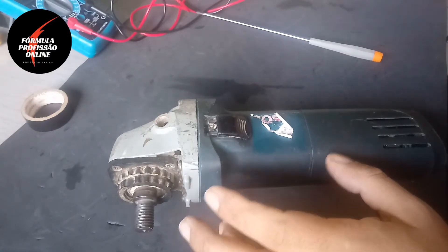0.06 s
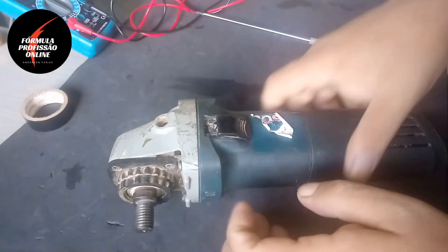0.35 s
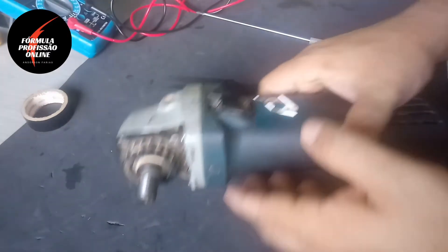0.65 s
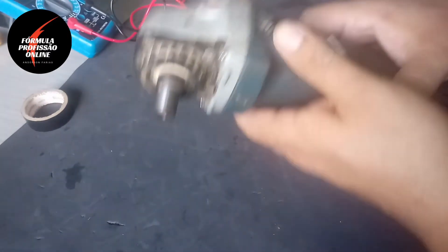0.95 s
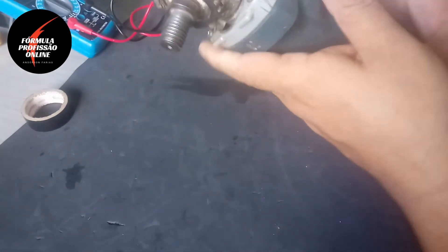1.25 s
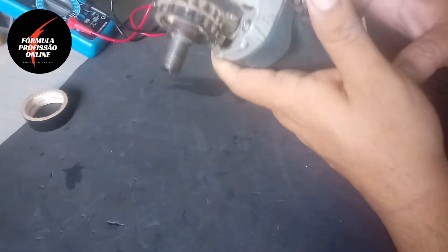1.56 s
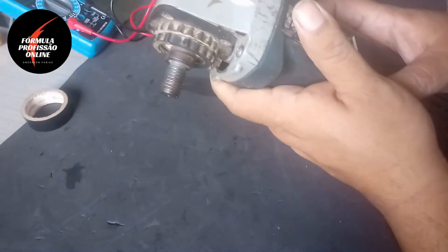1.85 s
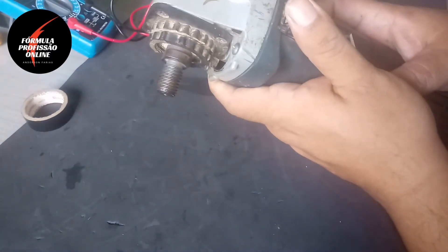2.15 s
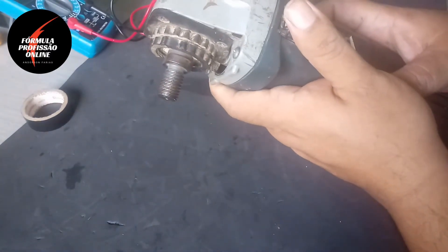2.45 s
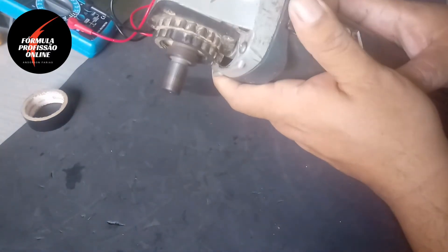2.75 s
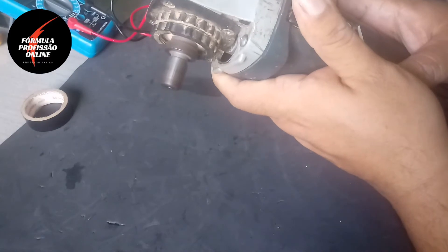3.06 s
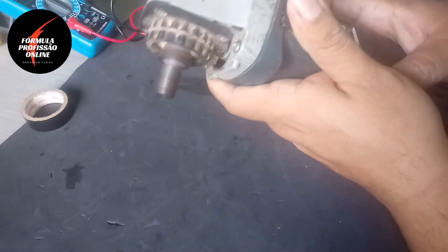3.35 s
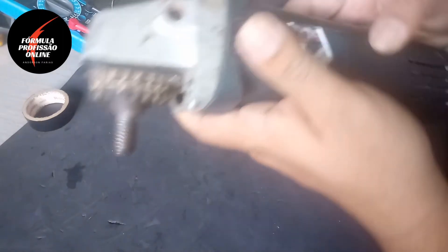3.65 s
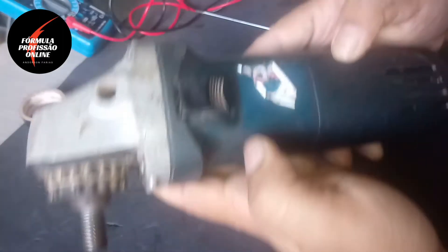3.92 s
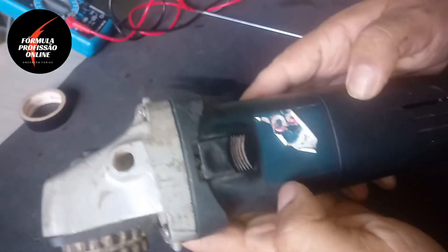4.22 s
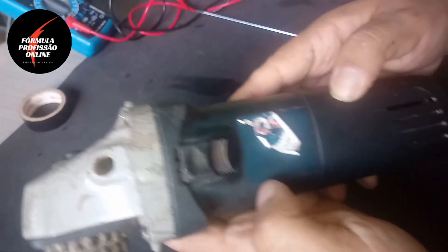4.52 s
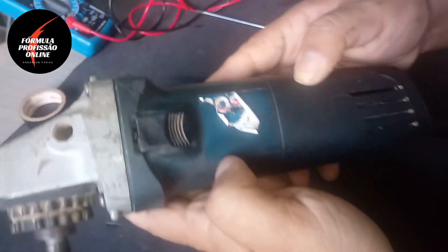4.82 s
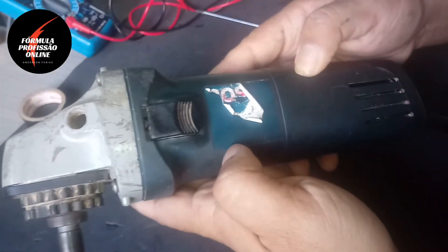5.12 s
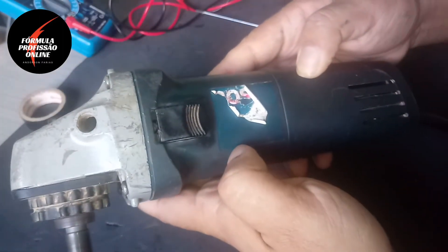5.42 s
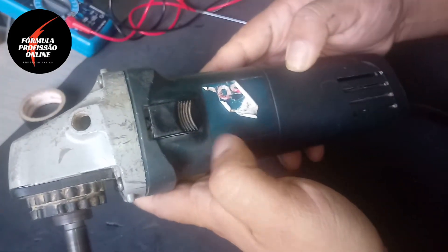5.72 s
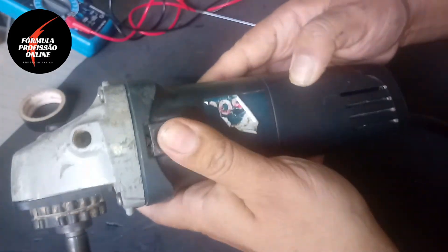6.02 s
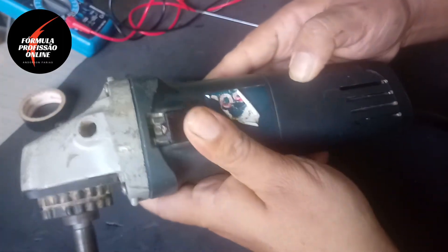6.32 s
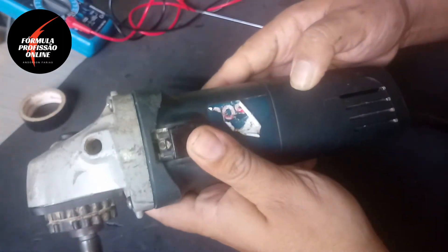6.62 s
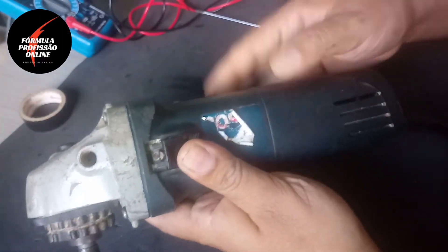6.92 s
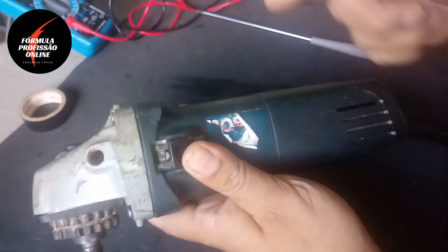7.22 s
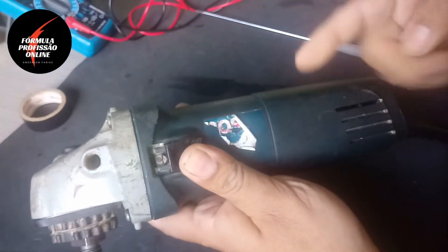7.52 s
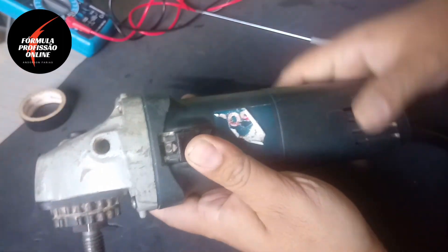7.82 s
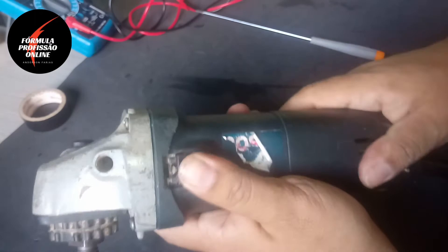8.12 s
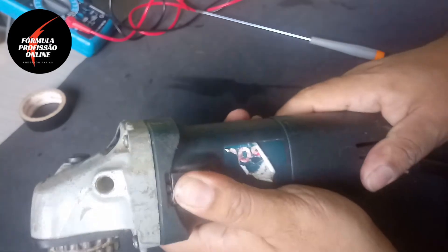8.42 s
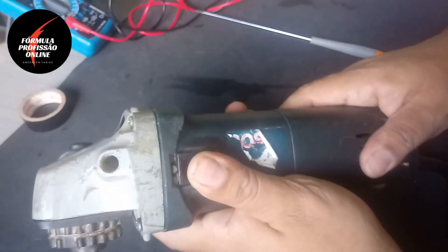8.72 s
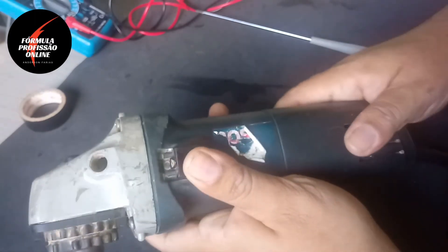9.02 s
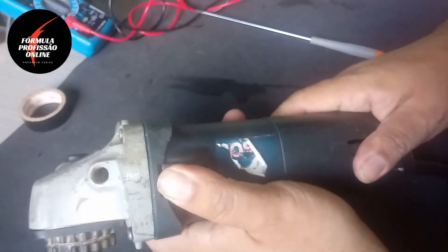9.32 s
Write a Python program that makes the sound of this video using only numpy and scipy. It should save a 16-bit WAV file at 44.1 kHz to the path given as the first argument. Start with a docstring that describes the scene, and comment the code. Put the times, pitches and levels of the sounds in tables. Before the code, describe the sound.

After soft handling, an electric angle grinder whines loudly, coasts to a clattering stop, then starts again, dips briefly and speeds back up.

```python
"""In a small workshop, hands rub and tap a bare angle grinder as they lift it off a bench; a far engine passes.
At 2.5 s the switch snaps shut and the rotor spins up, singing in shaft orders (pinion teeth, commutator
bars) over the rasp of bevel gears, brushes and cooling air. From 6.2 s friction and drag brake it, and the
loose teeth rattle across their backlash until it stops. With its gear head turned away, the tool starts
again at 8.2 s, coasts briefly, and is switched on once more at 9.3 s."""
import sys
import numpy as np
from scipy import signal
from scipy.fft import rfft, irfft
from scipy.io import wavfile
from scipy.ndimage import uniform_filter1d

SR = 44100
rng = np.random.default_rng(int(sys.argv[2]) if len(sys.argv) > 2 else 0)


def generate_wav(sig):
    """Save sig (samples, or channels by samples) to the path in sys.argv[1] as 16-bit PCM at SR."""
    pcm = np.round(np.clip(np.atleast_2d(sig).T, -1, 1) * 32767).astype(np.int16)
    wavfile.write(sys.argv[1], SR, pcm)


N = 413216
TIME = np.arange(N) / SR
FULL_SPEED = 400  # [turns/s], like every rotor speed below
MAINS_HZ, BAND_EDGE_HZ = 60, 15800

# the switch is closed; the rotor is heard turning: (start [s], end [s])
POWERED = [(2.519, 6.205), (8.204, 8.9), (9.304, 12)]
RUNS = [(2.536, 7.475), (8.204, 9.5)]
# how far the gear head is turned from the listener: (time [s], share [0-1])
TURN_AWAY = [(3.3, 0), (3.9, 0), (7.5, 0.05), (8.1, 0.94)]
def grinder():
    """Rotating machinery: one shaft speed sets every tone and the rate of the rattle."""
    powered = during(POWERED)
    coasting = 1 - powered
    away = curves(TURN_AWAY)[0]
    speed, pull = rotor(powered)
    turns = np.cumsum(speed + .12 * drift(12)) / SR
    level = amp(-19.5 - 2 * pull - 7.5 * coasting * np.maximum(1 - speed / FULL_SPEED, 0))
    noise = rasp(speed, turns, powered, away) + amp(23.5) * chatter(speed, turns, powered)
    lead = whine(speed, turns, pull, powered, away)
    orders = amp(4.5) * shaft_orders(speed, turns, away)
    hum = unbalance_hum(speed, turns, away)
    turning = during(RUNS) * np.minimum(speed / 36, 1) ** coasting  # fades out below 36 turns/s
    return turning * (level * (noise + orders) + lead + hum) + gear_knocks() + switch()


# the wandering speed that the motor tends to: (time [s], speed [turns/s])
FREE_SPEED = [(2.55, 414), (2.8, 403.7), (3.15, 397.3), (3.5, 395.6), (3.8, 400.4), (4.3, 407.6),
              (5.1, 414.2), (5.45, 422.4), (5.7, 425.3), (6.1, 423.3), (8.4, 428.8), (8.9, 425.9)]
def rotor(powered, step=44):
    """Torque balance of motor, friction and quadratic air drag: gives speed and gear load (pull, 0-1)."""
    friction, full_speed_drag, full_pull = 288, 91, 700  # [turns/s^2]
    torque_span = 151.4  # lag that multiplies the torque by e [turns/s]

    def losses(v):
        return friction + full_speed_drag * (v / FULL_SPEED) ** 2
    speed, track = 0., []
    for on, free in zip(powered[::step], curves(FREE_SPEED)[0][::step]):
        acceleration = on * losses(free) * np.exp((free - speed) / torque_span) - losses(speed)
        speed = max(speed + acceleration * step / SR, 0)
        track.append((len(track) * step / SR, speed, acceleration))
    speed, acceleration = curves(track)
    return speed, np.clip(acceleration / full_pull, 0, 1)


# spectra of the tool at full speed, near standstill and turned away: (frequency [Hz], level [dB])
FAST_SPECTRUM = [(130.0, -41), (350.0, -12), (700.0, -8), (1200.0, -2.5), (1800.0, -8), (2300.0, 2),
                 (3100.0, -2.5), (4400.0, 1), (5100.0, -1), (6400.0, 2), (8300.0, -10), (10500.0, -13.5),
                 (13300.0, -24), (15300.0, -10.5)]
SLOW_SPECTRUM = [(130.0, -63.5), (350.0, -10.5), (700.0, -14.5), (1200.0, -18.5), (1800.0, -7.5),
                 (2300.0, 6), (3100.0, 0.5), (4400.0, -1), (5100.0, 1.5), (6400.0, -5.5), (8300.0, -9),
                 (10500.0, -13), (13300.0, -28), (15300.0, -11.5)]
AWAY_SPECTRUM = [(130.0, -54), (350.0, -20), (700.0, -15), (1200.0, -10.5), (1800.0, -13), (2300.0, -12.5),
                 (3100.0, 1), (4400.0, -2.5), (5100.0, -4), (6400.0, -7), (8300.0, -16), (10500.0, -21.6),
                 (13300.0, -28), (15300.0, -22)]
# gear head resonances, facing and turned away: (frequency [Hz], width [Hz], gain [dB])
HEAD_MODES = [(1670, 140, 3), (2280, 95, 1.5), (2530, 130, -1), (2860, 170, 4), (3400, 190, 5),
              (3986, 78, 1.5), (4490, 660, 4), (5470, 470, -2.5), (5470, 190, 5), (7150, 420, -1.5),
              (14900, 900, -0.5)]
AWAY_MODES = [(2420, 320, 3), (2770, 850, 9), (3370, 450, -6.5), (4270, 760, 7), (4800, 400, -4.5),
              (5680, 270, 6.5), (6700, 670, 6), (15100, 1000, 9)]
# further resonances with the teeth driven or loose: (frequency [Hz], width [Hz], gain [dB])
DRIVEN_MODES = [(3040, 130, 4.5), (4690, 330, 3)]
LOOSE_MODES = [(1540, 450, 2.5), (4020, 450, 6.5), (4600, 400, -3.5)]
def rasp(speed, turns, powered, away):
    """Source and filter: tooth clashes and fan noise, pulsing at twice the mains rate, excite the head."""
    # a slow rotor draws a large current, so the torque pulses hardest just after switching on
    inrush = powered / (1 + (speed / 170) ** 4)
    beat = np.cos(4 * np.pi * MAINS_HZ * (TIME - RUNS[1][0] - .0012))
    torque = amp((2.5 * powered + 5.5 * inrush) * beat - 1.4 * inrush)
    clashes = rng.random(N) < (500 + 3.5 * speed) / SR
    sizes = amp(3.25 * np.minimum(rng.exponential(1, N), 3.7))
    impulses = clashes * sizes * rng.choice([-1, 1], N)
    teeth = unit(signal.oaconvolve(impulses, burst(decay=0.001))[:N])  # scattering in the casting
    fan = rng.standard_normal(N) * (1 + 0.16 * np.cos(2 * np.pi * turns))
    drive = unit(teeth + amp(-1.5) * fan) * torque * amp(.5 * drift(9.7))
    driven = colour(drive, FAST_SPECTRUM, HEAD_MODES + DRIVEN_MODES)
    loose = colour(drive, FAST_SPECTRUM, HEAD_MODES + LOOSE_MODES)
    facing = powered * driven + (1 - powered) * loose
    fast = away * colour(drive, AWAY_SPECTRUM, AWAY_MODES) + (1 - away) * facing
    slow = amp(3) * colour(drive, SLOW_SPECTRUM, HEAD_MODES + LOOSE_MODES)
    fast_share = np.clip((speed - 140) / 230, 0, 1)
    return fast_share * fast + (1 - fast_share) * slow


# gear tone and commutator whine as the tool is moved about: (time [s], level [dB])
GEAR_LEVEL = [(2.7, -25), (2.9, -31.5), (3.05, -27), (3.7, -30.5), (4.4, -35), (4.55, -28), (5.15, -25),
              (5.7, -40.5), (7.399, -37), (8.25, -30), (8.42, -26), (8.62, -33.5), (8.85, -28.5),
              (9.2, -32), (9.31, -34)]
BAR_LEVEL = [(2.95, -23.5), (3.03, -18), (3.13, -29), (3.25, -21), (3.53, -30), (3.99, -18.5),
             (4.68, -26.5), (4.82, -22), (5.19, -37.5), (5.33, -29), (5.64, -26.5), (6.2, -25.5)]
# their partials: (harmonic number, level [dB], gain at full pull [dB], gain when coasting [dB])
GEAR_PARTIALS = [(1, -3, 6.5, 3), (2, -12, 17, -2)]
BAR_PARTIALS = [(1, -0.5, -1, 0.44), (2, -6, -1, 3.8), (3, -16.5, 4, 7.7), (4, -21, -1, 6)]
# how well the housing radiates: (frequency [Hz], gain [dB])
RADIATION = [(400, -38), (1300, 0.5), (2000, -3), (3400, 0), (4300, 0), (5200, -5), (7000, 4.5), (8700, -2),
             (9800, -1.5), (11500, -6.5), (13700, -14.5), (15400, 0)]
# sharp gear head resonances; peaks and gaps of the motor case: (frequency [Hz], width [Hz], gain [dB])
SHARP_MODES = [(2720, 20, 11.5), (3190, 24, 5.5), (3400, 110, -0.5), (4550, 290, 1.5), (5072, 22, 11)]
CASE_MODES = [(3450, 690, 2), (4470, 810, -5), (5490, 250, 3), (5900, 230, 6), (6555, 580, 9),
              (7050, 280, -7), (7540, 310, 3), (15400, 700, 4.5)]
def whine(speed, turns, pull, powered, away):
    """Periodic forcing: teeth and commutator bars sound harmonics that flare on crossing a resonance."""
    pinion_teeth, commutator_bars = 9, 24

    def harmonics(per_turn, partials, modes):
        total = np.zeros(N)
        for harmonic, db, pull_db, coast_db in partials:
            order = per_turn * round(harmonic)
            hz = order * speed
            force_db = db + pull_db * pull + coast_db * (1 - powered)
            housing_db = read(RADIATION, hz) + resonances(modes, hz) + 1.4 * fading(hz)
            total += amp(force_db + housing_db) * tone(order, speed, turns, rough=.19 + .3 * pull)
        return total
    gear = amp(curves(GEAR_LEVEL)[0]) * harmonics(pinion_teeth, GEAR_PARTIALS, HEAD_MODES + SHARP_MODES)
    bar_db = curves(BAR_LEVEL)[0] + 2 * away - 0.17
    bars = amp(bar_db) * harmonics(commutator_bars, BAR_PARTIALS, CASE_MODES)
    ring_db = -32.5 - 0.23 * np.maximum(FULL_SPEED - speed, 0)  # the fifth order rings near full speed
    ring = amp(ring_db) * (1 - away ** 2) * tone(5, speed, turns, rough=0.29)
    build_up = np.minimum(speed / 117, 1) ** powered  # on starting, the tones emerge up to 117 turns/s
    torque_ripple = 1 + .24 * powered * np.cos(4 * np.pi * MAINS_HZ * TIME)  # adds sidebands
    return (gear + bars + ring) * build_up * torque_ripple


# weaker tones: (order [cycles/turn], relative level [dB])
ORDERS = [(2, -21.5), (7, -17.5), (8, -13), (10, -15), (12, -18.5), (14, -25.5), (19, -12), (21, -14),
          (23, -20), (25, -9), (27, -14.5), (29, -12.5), (31, -19.5), (36, -17), (37, -20), (39, -18),
          (45, -14), (51, -18.5), (120, -9.5)]
def shaft_orders(speed, turns, away):
    """Fourier series: uneven parts repeat each turn, adding tones at whole multiples of the speed."""
    total = np.zeros(N)
    for order, db in ORDERS:
        hz = round(order) * speed
        # the low orders are driven by unbalance and air, and die away with speed
        push = np.minimum(speed / FULL_SPEED, 1) ** 1.5 if order < 24 else 1
        body_db = read(FAST_SPECTRUM, hz) + resonances(SHARP_MODES, hz) - 4 * away
        gain = push * amp(db + body_db + 2 * fading(hz)) * (hz < BAND_EDGE_HZ)
        total += gain * np.sin(2 * np.pi * (round(order) * turns + rng.random()))
    return total


def unbalance_hum(speed, turns, away):
    """Rotating unbalance shakes the tool once a turn, audibly only near full speed."""
    level_db = -40.6 - .22 * np.maximum(FULL_SPEED - speed, 0) - 3.4 * away
    return amp(level_db) * tone(1, speed, turns, rough=0.24)


# spectrum of tooth striking tooth: (frequency [Hz], level [dB])
CLACK_SPECTRUM = [(400, -16.5), (900, -12.5), (1400, 4), (2100, -3.5), (4000, -2.5), (6600, -0.5),
                  (7600, -15.5), (15000, -22)]
def chatter(speed, turns, powered):
    """Backlash: unloaded teeth rattle about once a turn, hardest while the rotor is slow."""
    count = np.floor(turns + .3 * drift(40))
    hits = np.diff(np.maximum.accumulate(count), prepend=count[0])
    sizes = amp(2 * rng.standard_normal(N))
    slack = np.interp(speed, [25, 100, 176, 288], [2.0, 1.57, 0.9, 0.17]) * amp(-7 * powered)
    rattle = signal.oaconvolve(hits * sizes * slack, burst(decay=0.00087))[:N]
    return colour(rattle, CLACK_SPECTRUM, HEAD_MODES + LOOSE_MODES)


# the hardest knocks across the backlash, on starting and as the rotor slows: (time [s], level [dB])
KNOCKS = [(2.537, -7), (7.177, -2), (7.218, -5), (7.259, -2), (7.277, -1.5), (7.339, -5), (7.368, -2.5),
          (7.402, -3.5), (7.421, -6), (8.2045, -1.5)]
def gear_knocks():
    """Impact excitation: colliding teeth ring the modes of the gear head."""
    return blows(KNOCKS, CLACK_SPECTRUM, decay=0.0013, modes=HEAD_MODES)


# snaps of the switch: (time [s], level [dB])
SNAPS = [(2.516, -29), (2.5195, -10.5), (8.1985, -13)]
# their spectrum: (frequency [Hz], level [dB])
SNAP_SPECTRUM = [(300, -24.5), (1500, -4), (4000, -12.5), (7000, -5), (9000, -11), (13000, -21.5),
                 (15500, -10)]
def switch():
    """A brief contact has a broad spectrum: the slide switch clicks as it snaps shut."""
    return blows(SNAPS, SNAP_SPECTRUM, decay=0.0073)


# skin slides over the plastic: (start [s], duration [s], level [dB])
RUBS = [(0.26, 0.61, -59), (0.72, 0.65, -58), (0.988, 0.091, -53.5), (1.272, 0.15, -56.5),
        (1.637, 0.23, -63), (7.84, 0.16, -58), (7.974, 0.088, -54.5), (8.133, 0.092, -54.5)]
# fingers tap the housing; the tool's weight shifts on hands and bench: (time [s], relative level [dB])
TAPS = [(.366, -37), (.591, -30), (.629, -30), (1.035, -40), (1.918, -39.5), (2.11, -40.5), (7.913, -39),
        (7.992, -41)]
THUMPS = [(.54, -42), (.62, -48), (1.4, -45), (1.84, -40.5), (2.14, -41), (2.43, -44), (7.42, -37),
          (7.48, -46), (7.88, -50), (8.0, -52)]
# spectra of skin contact and of the thumps: (frequency [Hz], level [dB])
SKIN_SPECTRUM = [(400, -3), (1200, 1.5), (2200, -3.5), (4000, -2), (6500, 1.5), (8500, -12), (12000, -25.5),
                 (15500, -24.5)]
THUMP_SPECTRUM = [(25, -31.5), (68, -3.5), (100, -10), (200, -9), (400, -20.5), (1500, -49.5)]
def hands():
    """Friction and soft impact: grainy rubbing and rumble swell with each slide, among taps and thumps."""
    slides = sum(amp(db) * np.sin(np.pi * np.clip((TIME - start) / length, 0, 1)) ** 2
                 for start, length, db in RUBS)
    level = amp(-73) + slides  # even a steady grip rustles faintly
    grains = rng.standard_normal(N) * amp(1.5 * drift(150) + 2.4 * drift(13))
    rub = amp(-0.5) * unit(colour(grains, SKIN_SPECTRUM, HEAD_MODES))
    rumble = amp(1.5) * unit(colour(rng.standard_normal(N), THUMP_SPECTRUM))
    taps = amp(-9) * blows(TAPS, SKIN_SPECTRUM, decay=.014, modes=HEAD_MODES)
    thumps = amp(-0.5) * blows(THUMPS, THUMP_SPECTRUM, decay=0.09)
    return level * (rub + rumble) + taps + thumps


# reverberation of the workshop: (frequency [Hz], time to fall 60 dB [s])
ROOM_T60 = [(200, 0.77), (1000, 0.48), (3000, 0.52), (7000, 0.47), (14000, 0.16)]
def room(x):
    """Reverberation: dense reflections decay exponentially, each band at its own rate."""
    reflections = rng.standard_normal(SR) * (rng.random(SR) < .1) * (TIME[:SR] > .004)
    hz, t, bands = signal.stft(reflections, SR, nperseg=256)
    decay = amp(-60 * t / read(ROOM_T60, hz)[:, None])
    tail = signal.istft(bands * decay, SR, nperseg=256)[1]
    return signal.fftconvolve(x, tail / np.linalg.norm(tail))[:N]


# engine tones: (order [cycles/turn], level [dB], time of peak [s], half width [s])
ENGINE_ORDERS = [(6, -50, 1.75, 0.41), (7, -53.5, 1.2, 1), (10, -56, 1.4, .45)]
def far_engine():
    """Engine orders: harmonics of a slowly quickening shaft swell and fade as the engine passes."""
    start_hz, rise_hz_per_s = 42.1, 1.27
    turns = np.cumsum(start_hz + rise_hz_per_s * TIME + 0.15 * drift(7.2)) / SR
    drone = np.zeros(N)
    for order, db, peak_time, width in ENGINE_ORDERS:
        swell = amp(db + 2 * drift(6)) / (1 + ((TIME - peak_time) / width) ** 2)
        drone += swell * np.sin(2 * np.pi * round(order) * turns)
    return amp(0.5) * drone


# spectrum of the street: (frequency [Hz], relative level [dB])
STREET_SPECTRUM = [(15, -57.5), (25, -17), (59, -16.5), (108, -20.5), (270, -7.5), (384, -10.5),
                   (439, -10.5), (531, -22), (659, -16.5), (754, -25), (1440, -23.5), (2220, -39.5),
                   (16000, -58.5)]
def street():
    """Stationary noise: a low, steady wash from outside."""
    return amp(-53.5) * unit(colour(rng.standard_normal(N), STREET_SPECTRUM))


def tone(order, speed, turns, rough):
    """Random amplitude and phase modulation broadens one shaft order into a rough tone."""
    wobble = (1 + rough * (drift(26) + 1j * drift(38))) / np.sqrt(1 + 2 * rough ** 2)
    wave = (wobble * np.exp(2j * np.pi * (order * turns + rng.random()))).real
    return np.sqrt(2) * wave * (order * speed < BAND_EDGE_HZ * 1.1)


def fading(hz):
    """Level ripple [dB] of a tone gliding through the many resonances of housing and room."""
    return np.interp(hz / 170 + TIME, np.arange(500), rng.standard_normal(500))


def resonances(modes, hz):
    """Gain [dB] at hz from a sum of Lorentzian peaks."""
    return sum(db / (1 + (2 * (hz - centre) / width) ** 2) for centre, width, db in modes)


def colour(x, spectrum, modes=(), size=4096):
    """Minimum-phase filter of energy 1 with the given spectrum and resonances."""
    hz = abs(np.fft.fftfreq(size, 1 / SR))
    db = read(spectrum, hz) + resonances(modes, hz)
    db -= 20 * np.log10(1 + (spectrum[0][0] / 2 / (hz + 1)) ** 2)  # bass roll-off
    response = np.exp(np.conj(signal.hilbert(np.log(amp(db)))))
    taps = np.fft.ifft(response).real[:size // 2]
    return signal.oaconvolve(x, taps / np.linalg.norm(taps))[:N]


def blows(rows, spectrum, decay, modes=()):
    """Superposition: short scattered contacts ring in one body."""
    force = np.zeros(N + SR)
    for start, db in rows:
        blow = burst(decay)
        force[round(start * SR):][:len(blow)] += amp(db) * blow * np.sqrt(decay * SR / 10)
    return colour(force[:N], spectrum, modes)


def burst(decay):
    """Scattering spreads a click over a decay time [s] while its spectrum stays flat."""
    t = TIME[:round(8 * decay * SR)]
    spectrum = rfft(rng.standard_normal(SR)[:len(t)] * np.exp(-t / decay), 2 * len(t))
    return irfft(spectrum / abs(spectrum))[:len(t)]


def drift(hz, size=4096):
    """Low-passed noise: a random wavering of rms 1, up to about the given rate."""
    f = np.fft.rfftfreq(size, TIME[-1] / size)
    slow = irfft(rfft(rng.standard_normal(size)) / (1 + (f / hz) ** 2))
    return np.interp(TIME, np.linspace(0, TIME[-1], size), unit(slow))


def during(spans):
    """1 inside the spans, 0 outside, with short ramps."""
    return uniform_filter1d(sum(1. * ((TIME >= a) & (TIME < b)) for a, b in spans), size=60)


def curves(rows):
    """Each column of a table of timed rows, sample by sample."""
    times, *columns = np.transpose(rows)
    return [np.interp(TIME, times, column) for column in columns]


def read(points, hz):
    """Interpolates a table on a log-frequency axis."""
    f, value = np.transpose(points)
    return np.interp(np.log(hz + 1), np.log(f), value)


def amp(db):
    """Decibels to gain."""
    return 10 ** (np.asarray(db) / 20)


def unit(x):
    """Scales to rms 1."""
    return x / np.sqrt(np.mean(x ** 2) + 1e-20)


def scene():
    """Close to the tool, direct sound outweighs reverberation; both channels are alike."""
    near = grinder() + hands()
    mono = near + amp(-12) * room(near) + far_engine() + street()
    return np.array([mono, mono])


def record(dry):
    """Soft saturation rounds off the highest peaks, then a low-pass filter limits the band."""
    rounded = dry / (1 + (abs(dry) / .8) ** 6) ** (1 / 6)
    low_pass = signal.firwin(511, BAND_EDGE_HZ, window=("kaiser", 9), fs=SR)
    return signal.oaconvolve(rounded, low_pass[None], "same")


dry = scene()
out = record(dry)
generate_wav(out)
```